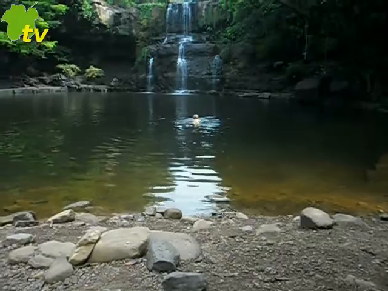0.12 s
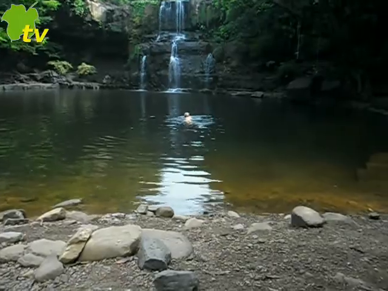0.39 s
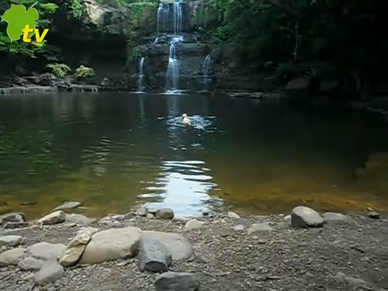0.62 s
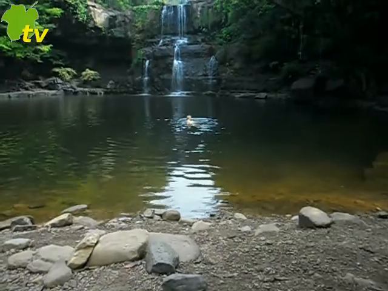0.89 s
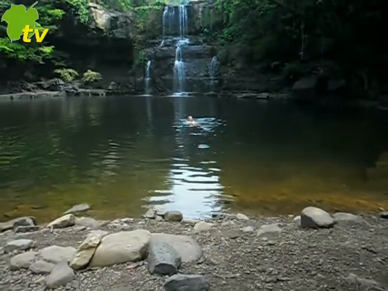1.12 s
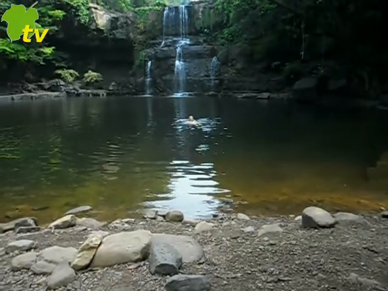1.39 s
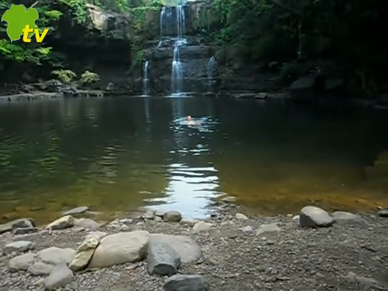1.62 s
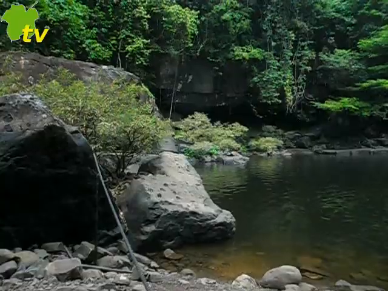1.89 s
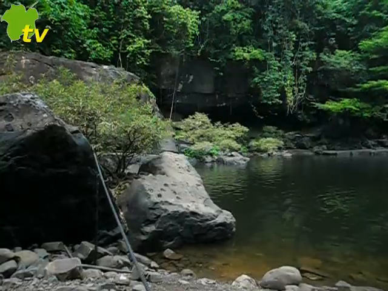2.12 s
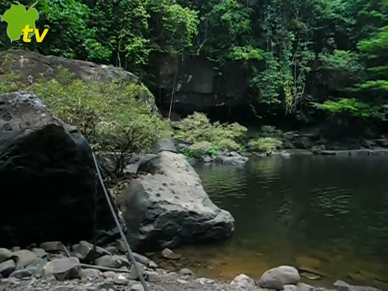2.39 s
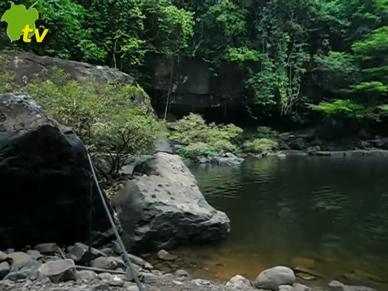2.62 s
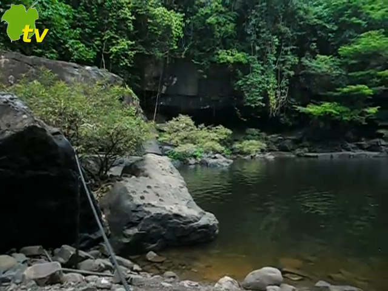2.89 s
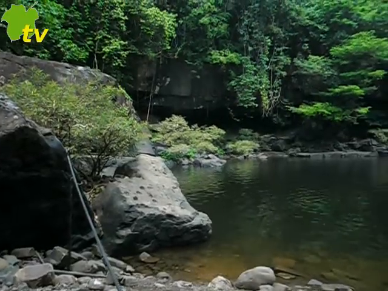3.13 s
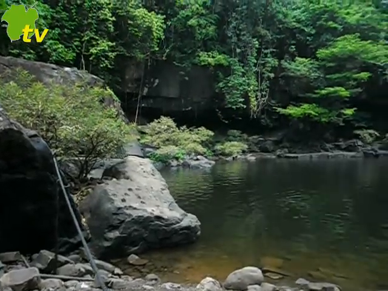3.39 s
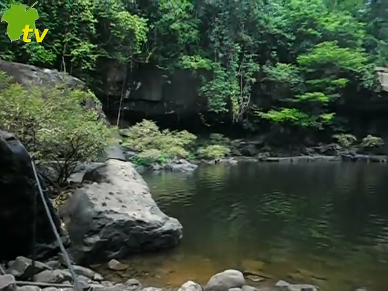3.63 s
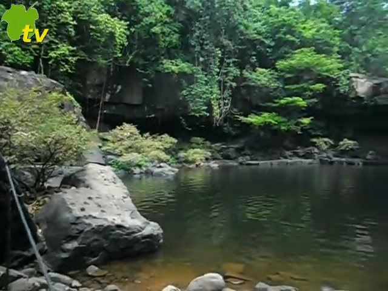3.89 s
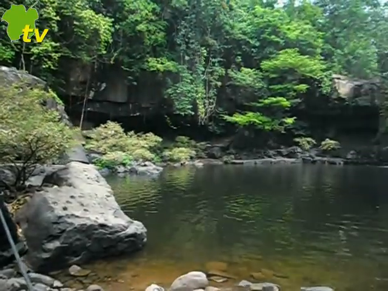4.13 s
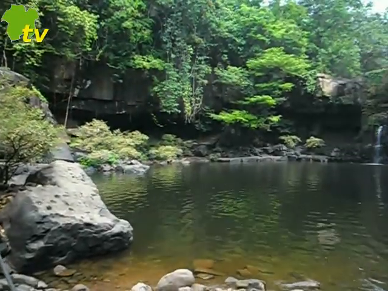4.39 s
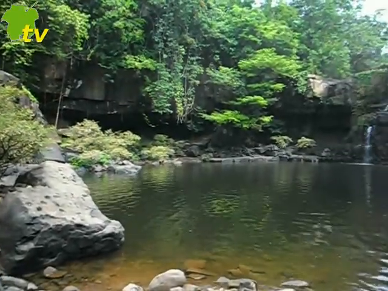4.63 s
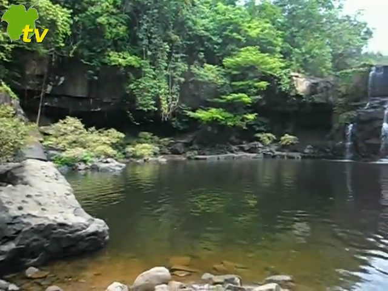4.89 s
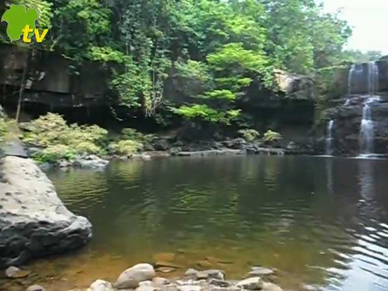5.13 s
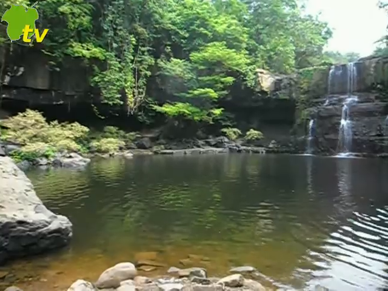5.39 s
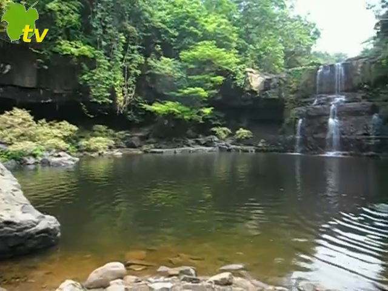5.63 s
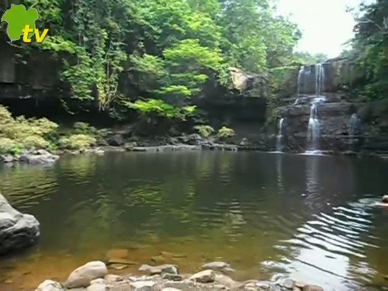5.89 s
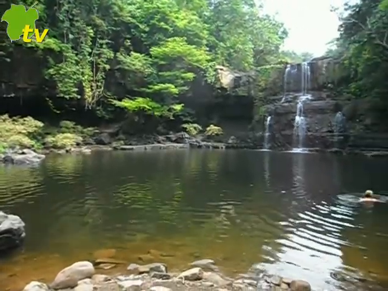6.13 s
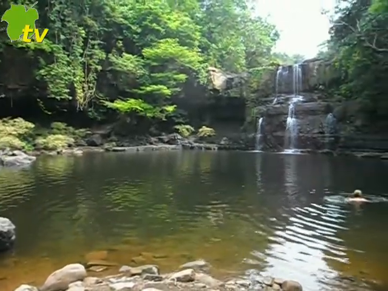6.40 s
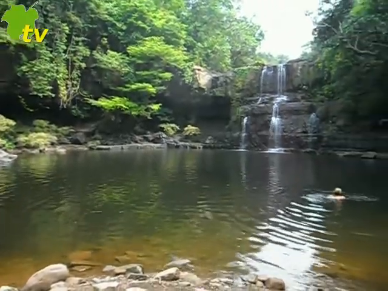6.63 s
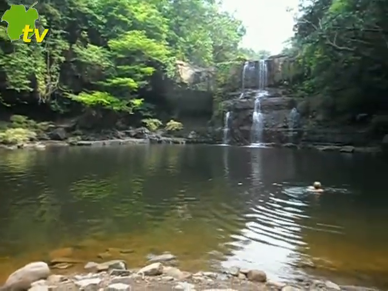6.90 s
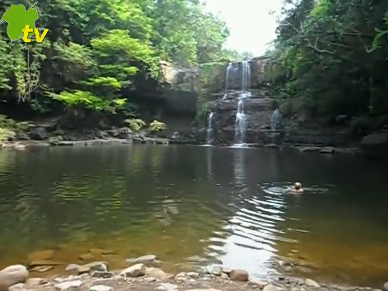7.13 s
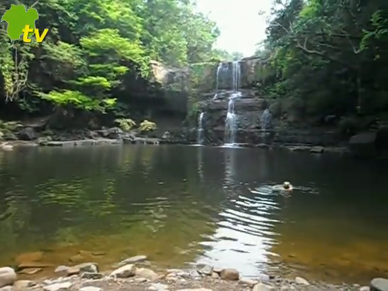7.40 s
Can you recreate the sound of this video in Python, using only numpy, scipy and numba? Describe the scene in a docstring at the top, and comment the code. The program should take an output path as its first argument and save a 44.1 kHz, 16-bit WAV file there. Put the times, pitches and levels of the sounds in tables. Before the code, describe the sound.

Constant rushing of falling water over rock ledges, cut by a short dead silence, then the same bubbly roar resumes with changing colour.

```python
"""A waterfall spills over rock ledges into a forest pool, heard from the stony shore by a small camera microphone.
First the camera faces the fall; a short quieter shot follows at 1.6 s and breaks off into silence.
From 2.4 s the roar is back, its colour shifting as the camera turns: quickly until 4 s, then at about half that rate.
The roar is noise for spray plus thousands of ringing bubbles, with short bursts of filtered noise in it.
The camera samples at half rate, so the top of the treble is mirrored above 11 kHz."""
import sys
import numpy as np
from scipy import signal
from scipy.fft import rfft, irfft
from scipy.io import wavfile
from scipy.ndimage import uniform_filter1d
from numba import njit

SR = 44100
rng = np.random.default_rng(int(sys.argv[2]) if len(sys.argv) > 2 else 0)


def elevation(decibels):
    """Turn decibel levels (scalar or array-like) into linear amplitude ratios."""
    levels = np.asarray(decibels, float)
    return 10 ** (levels / 20)


def output_pcm(signal):
    """Save a mono or channel-first signal as 16-bit PCM at the path in sys.argv[1].

    Samples are clipped to [-1, 1] before scaling.
    """
    pcm = np.clip(np.atleast_2d(signal).T, -1, 1) * 32767
    wavfile.write(sys.argv[1], SR, np.round(pcm).astype(np.int16))


N = 331632  # samples

# the short shot starts at the cut; the silent gap leads to the turning shot
CUT_S, GAP_FROM_S, GAP_TO_S = 1.575, 1.7143, 2.4466


def on_log(hz, table):
    """Read a (f/Hz, level/dB) table on a log-frequency axis."""
    f, db = np.transpose(table)
    return np.interp(np.log(np.maximum(hz, 1)), np.log(f), db)


def on_time(table):
    """Read a (t/s, value) table at every sample."""
    s, v = np.transpose(table)
    return np.interp(np.arange(N) / SR, s, v)


def colour(x, db):
    """Filter by a gain in dB per frequency bin."""
    return irfft(rfft(x) * elevation(db), N)


def unit(x):
    """Scale to rms 1."""
    return x / np.sqrt(np.mean(x ** 2))


def walk(rate):
    """Random levels held 1 / rate s and slewed twice; spread near 1."""
    hold = int(SR / rate)
    steps = np.repeat(rng.standard_normal(N // hold + 1), hold)
    return 1.18 * uniform_filter1d(uniform_filter1d(steps, hold), hold)[:N]


def noise_bursts():
    """Short bursts of filtered noise in the roar: each rises quickly and dies in a few tens of ms."""
    # the louder bursts: t/s, level/dB before the envelope, centre f/Hz
    louder = [(.388, -36, 900), (1.038, -37, 2800), (1.135, -38.5, 2800), (1.352, -35, 940),
              (3.14, -36.5, 920), (3.508, -32, 1070), (3.885, -33, 2780), (4.942, -36, 960),
              (5.275, -36, 3000), (5.424, -36.5, 2900), (5.69, -36.5, 960), (5.69, -37, 3000),
              (7.187, -36, 2600), (7.357, -35, 2900), (7.474, -35, 1000)]
    rise_s, fade_s = .0075, 0.026
    out, t = np.zeros(N + SR), np.arange(SR // 5) / SR
    envelope = (1 - np.exp(-t / rise_s)) * np.exp(-t / fade_s)
    # twelve fainter noise bursts at random times, within 1.5 dB and a tenth of the pitch
    when, size, pitch = rng.random(size=(12, 3)).T
    faint_db = -41.5 + 1.5 * (2 * size - 1)
    faint_hz = 920 * (1 + .2 * (pitch - .5))
    fainter = zip(when * N / SR, faint_db, faint_hz)
    for s, db, hz in [*louder, *fainter]:
        band = signal.butter(2, [hz / 1.3, hz * 1.2], "band", fs=SR, output="sos")
        noise = unit(signal.sosfilt(band, rng.standard_normal(len(t))))
        start = int(s * SR)
        out[start:start + len(t)] += elevation(db) * noise * envelope
    return out[:N]


@njit
def ring(start, hz, size, cycles, glide, length):
    """Each grain is a fading sine whose pitch rises as the bubble nears the surface."""
    y = np.zeros(length)
    for k in range(len(start)):
        w, a, phase = 2 * np.pi * hz[k] / SR, size[k], 0.
        # over the given cycles the level falls by e and the pitch rises by the glide factor
        fade = np.exp(-hz[k] / SR / cycles)
        rise = glide ** (hz[k] / SR / cycles)
        for i in range(start[k], min(length, start[k] + int(5 * cycles * SR / hz[k]))):
            y[i] += a * np.sin(phase)
            phase += w
            w *= rise
            a *= fade
    return y


def bubbles(low_hz, high_hz, spread_db, cycles, glide, count):
    """A rain of bubbles of all sizes, some louder than the rest; even energy per Hz."""
    when, pitch, big = rng.random((count, 3)).T
    hz = low_hz + (high_hz - low_hz) * pitch
    size = elevation(spread_db * big ** 2) * np.sqrt(hz)  # high bubbles ring shorter, so they start louder
    return unit(ring((when * N).astype(np.int64), hz, size, 1. * cycles, 1. * glide, N))


def directional_response(x, hz, first, facing):
    """The peaks and dips heard change with the camera's direction: blend four responses."""
    # microphone peaks and dips per direction; the 11 kHz dip belongs to the half-rate sampling:
    # f/Hz, width/Hz, first place/dB, turned away/dB, half turned/dB, facing/dB
    peaks_and_dips = [(930, 59, -0.5, 0, 2.5, -1), (1095, 100, -0.5, 1.5, -1.5, -2),
                      (1245, 70, 1, -5.5, -3.5, -3), (1350, 90, -4.5, -0.5, -0.2, -1),
                      (1900, 200, -1.5, 0.5, -0.2, 1), (2356, 90, -3, -3, -2, 1),
                      (2620, 150, -1, -0.5, 1, 2.5), (3180, 110, 1, 0.5, 3, 3),
                      (4130, 300, -0.6, -0.8, 0, -5), (4700, 200, -0.7, 1.5, -2, 3.5),
                      (5800, 510, 1.5, 0.5, 2, 3), (7300, 360, 0.5, -.5, 0.5, 2.5),
                      (8400, 380, 0.5, 0.5, -1, -4.5), (10100, 820, 3.5, 4, 4, 6),
                      (11000, 350, -6, -5.5, -5, -5)]
    turning = [(1 - first) * np.clip(1 - np.abs(2 * facing - k), 0, 1) for k in range(3)]
    bells = np.array([np.exp(-.5 * ((hz - f) / width) ** 2) for f, width, *_ in peaks_and_dips])
    responses = np.array(peaks_and_dips).T[2:]
    return sum(share * colour(x, db @ bells) for share, db in zip([first, *turning], responses))


def roar(hz):
    """Spray hiss and bubbles in third-octave bands: all surge, neighbours sway together, each flickers."""
    # overall colour of the roar: f/Hz, relative level/dB
    roar_colour = [(15, -38), (25, -10), (75, -12), (115, -6), (372, -8), (492, -4), (819, -2.5),
                   (930, -1.5), (1230, -1.5), (2160, -7.5), (2580, -6.5), (4070, -12), (5820, -12),
                   (9930, -27), (11000, -31), (14300, -60), (22000, -120)]
    # colour added at the first standing place: f/Hz, level/dB
    first_colour = [(60, 0), (500, .5), (1000, -.5), (1350, -2.5), (2000, 3.5), (3000, 3), (4500, 1.5),
                    (5500, 4), (7000, -4), (9000, 3.5)]
    # colour added in the short shot: f/Hz, level/dB
    short_colour = [(60, -8), (300, 0.5), (600, -0.5), (1500, -0.5), (2500, 4), (4000, 1.5), (5500, 3.5),
                    (7000, -1.5), (10000, 3.5)]
    # colour added in proportion as the camera faces the fall: f/Hz, level/dB
    facing_colour = [(60, -1.5), (400, -3.5), (1000, -2), (1500, -5.5), (2600, 0), (3300, 1), (4300, -1.6),
                     (7000, -1.5), (9000, 1.5), (10500, -0.5)]
    # camera turning, quickly until 4 s, then at about half that rate: t/s, facing the fall (0-1)
    camera_turn = [(2.45, 0), (4.0, 0.37), (7.52, 0.8)]
    kinship = .75  # correlation of the sway in neighbouring bands

    spray = rng.standard_normal(N)
    large = elevation(-10.5) * bubbles(300, 4495, 9.3, 4.0, 1.08, count=12000)
    small = elevation(-8.5) * bubbles(2000, 9970, 11, 1.7, 1.05, count=40000)
    water = rfft(spray + large + small)

    t = np.arange(N) / SR
    first = t < CUT_S
    short = (t >= CUT_S) & (t < GAP_TO_S)
    facing = on_time(camera_turn) * (t >= GAP_TO_S)

    # level movements in dB; the low rumble swells and sinks slowly
    surge, sway, rumble = .3 * walk(9), walk(5), 1.5 * walk(1.6)
    octave = np.log2(np.maximum(hz, 1) / 25)
    out = 0
    for step in range(28):
        centre = 25 * 2 ** (step / 3)
        share = np.cos(np.pi / 2 * np.clip(3 * octave - step, -1, 1)) ** 2  # overlapping band
        sway = kinship * sway + np.sqrt(1 - kinship ** 2) * walk(7)
        flicker = .9 * walk(18)
        lively = np.interp(np.log(centre), np.log([100, 900, 3000, 5000, 10000]), [.5, 0.55, 0.44, 0.35, .5])
        db = surge + lively * (0.676 * sway + flicker)
        db += rumble / (1 + (centre / 220) ** 2)  # halved at 220 Hz
        db += first * on_log(centre, first_colour) + short * on_log(centre, short_colour)
        db += facing * on_log(centre, facing_colour)
        out = out + elevation(db) * irfft(water * share, N)
    out = directional_response(colour(out, on_log(hz, roar_colour)), hz, first, facing)
    return out / np.sqrt(uniform_filter1d(out ** 2, size=SR // 2))  # even out the half-second level


def scene():
    """The roar at its level in each shot, with the noise bursts."""
    hz, t = np.fft.rfftfreq(N, 1 / SR), np.arange(N) / SR
    first_db, short_db, turn_db = -37, -40.5, -37.5
    shot_db = np.where(t < CUT_S, first_db, np.where(t < GAP_TO_S, short_db, turn_db))
    return (roar(hz) * elevation(shot_db) + noise_bursts())[None]


def roll_off(x):
    """The treble ends steeply here."""
    return signal.sosfilt(signal.butter(12, 14040, fs=SR, output="sos"), x)


def record(dry):
    """Half-rate sampling leaves a mirror of the treble; the sound drops out between two shots."""
    # smoothing after doubling the rate: f/Hz, level/dB
    smoothing = [(9000, 0), (11025, -2.5), (11800, -9), (12800, -18.5), (13700, -32), (13850, -53.5),
                 (16000, -68)]
    hz, t = np.fft.rfftfreq(N, 1 / SR), np.arange(N) / SR
    below_mirror = colour(dry[0], -200 * (hz > SR / 4))
    half_rate = 2 * below_mirror * (np.arange(N) % 2)  # every other sample is zero
    # sharp stop, then a 1.2 ms fade-in
    audible = (t < GAP_FROM_S) + np.clip((t - GAP_TO_S) / .0012, 0, 1)
    mix = colour(half_rate, on_log(hz, smoothing)) * audible
    return roll_off(mix[None])


dry = scene()
out = record(dry)
output_pcm(out)
```